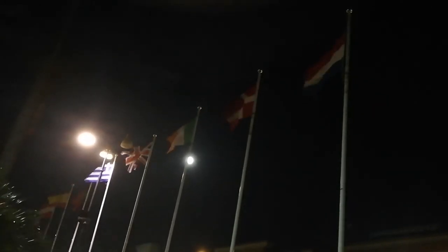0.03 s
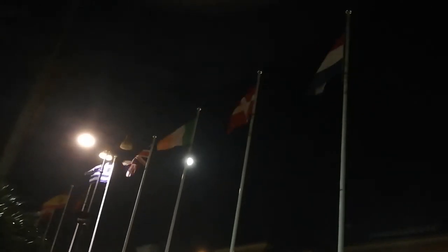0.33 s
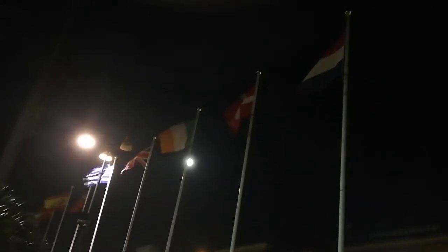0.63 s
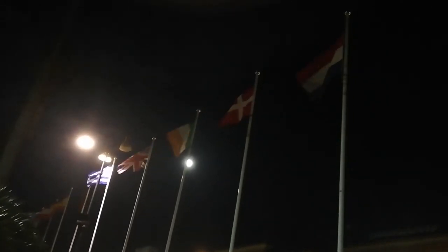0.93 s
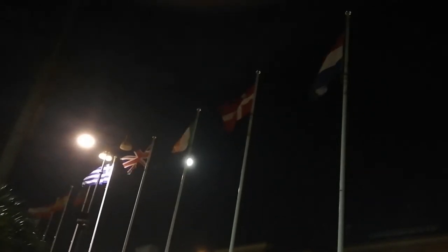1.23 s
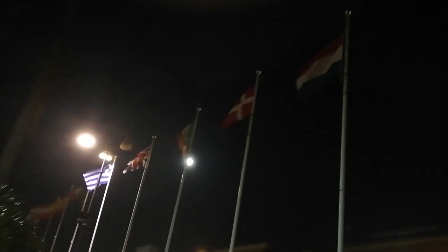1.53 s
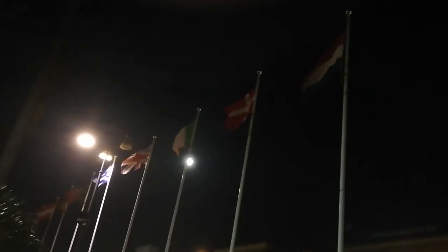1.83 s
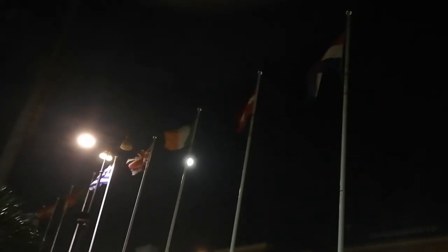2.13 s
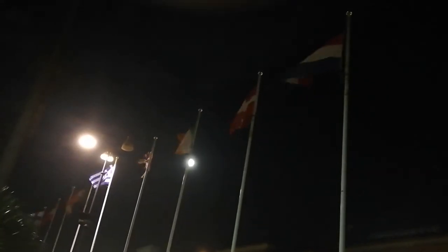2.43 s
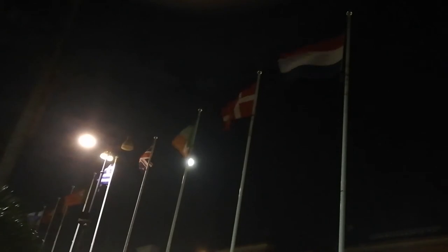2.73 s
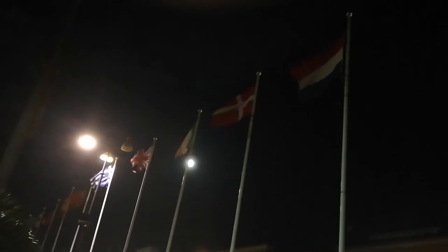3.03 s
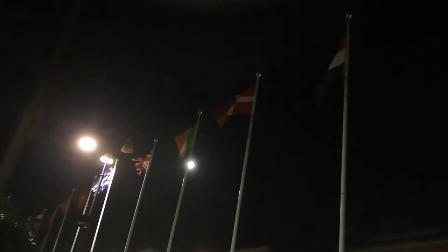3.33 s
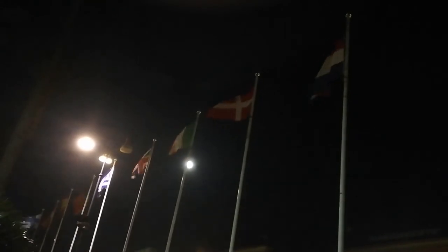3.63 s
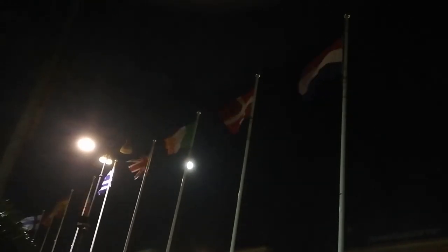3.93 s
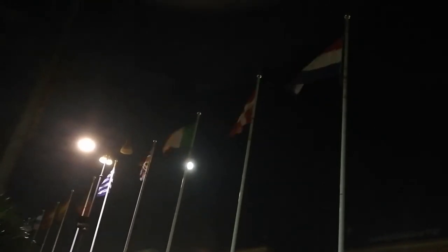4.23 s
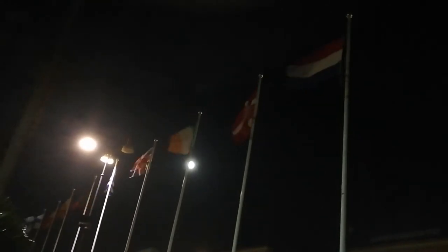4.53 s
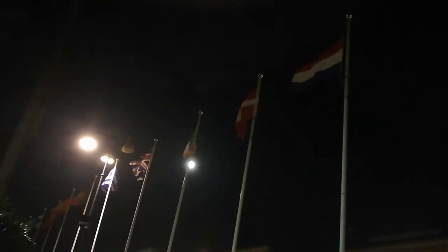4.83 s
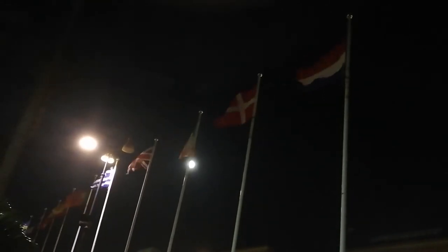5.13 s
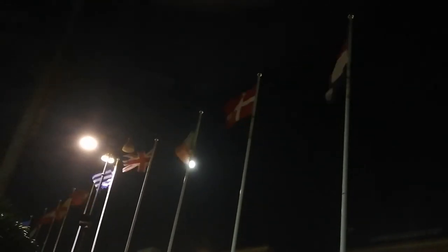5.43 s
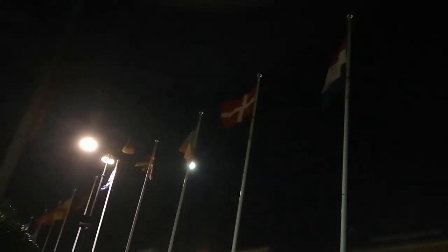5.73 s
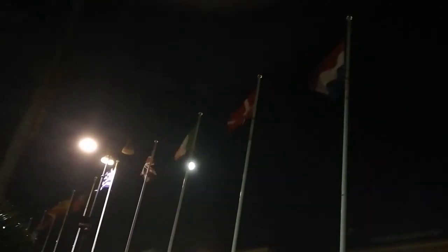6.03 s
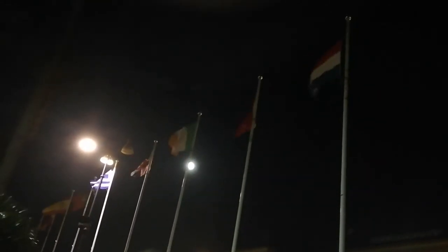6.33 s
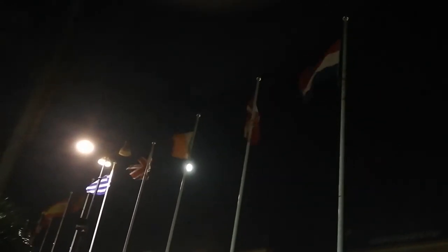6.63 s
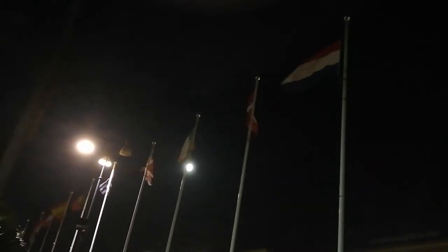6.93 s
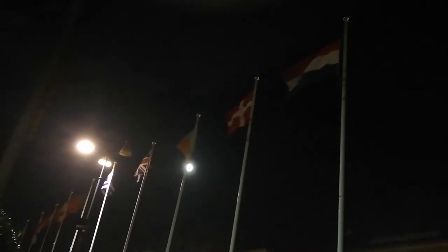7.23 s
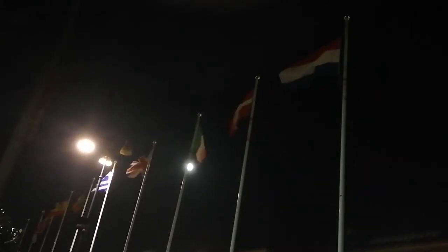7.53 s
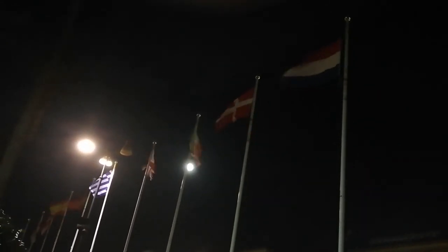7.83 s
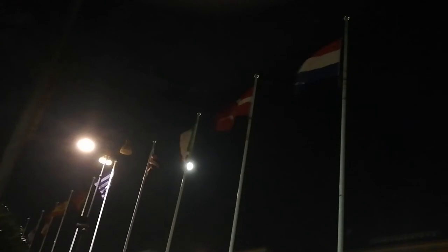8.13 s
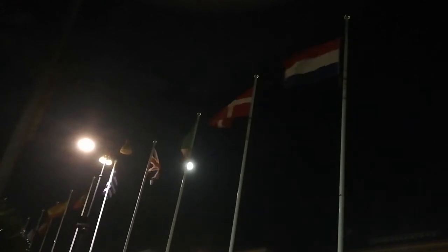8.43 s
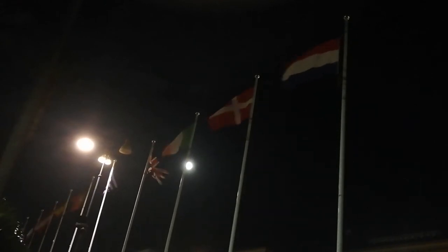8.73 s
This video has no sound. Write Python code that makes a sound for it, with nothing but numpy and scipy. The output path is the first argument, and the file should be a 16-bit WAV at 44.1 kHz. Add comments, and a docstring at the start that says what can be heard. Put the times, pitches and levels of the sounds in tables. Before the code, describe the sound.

Gusty wind rumbles and buffets the microphone while ropes knock and click against hollow flagpoles and flags snap lightly.

```python
"""Flagpoles on a windy night.

Gusts rumble, buffet and tear at two microphone ports; hard ones duck the gain.
Ropes slap hollow poles, which knock and ring. Folds whip through the flags and crackle.
Behind: a hiss of distant wind and town, rustling leaves, a faint whistle across a pole."""
import sys
import numpy as np
from scipy import signal
from scipy.fft import rfft, irfft, next_fast_len
from scipy.io import wavfile
from scipy.ndimage import uniform_filter1d

SR = 44100
rng = np.random.default_rng(int(sys.argv[2]) if len(sys.argv) > 2 else 0)


def bounce(signal):
    """Save signal as a 16-bit WAV file at the path given by the first command-line argument."""
    frames = np.transpose(np.atleast_2d(signal))
    limited = np.clip(frames, -1, 1)
    pcm = np.round(limited * 32767).astype(np.int16)
    wavfile.write(sys.argv[1], SR, pcm)


N = 387638

# breeze between gusts: t/s, level re calm/dB
BREEZE_LEVEL = [(0, -1), (0.75, -1), (1.6, 0.4), (2.6, 0.7), (4.1, -1.5), (4.85, 3.5), (6.5, 7), (7.08, 1),
                (7.7, 4.5), (8.55, 0.5)]
# gusts over the ports: t/s, length/s, rumble/dB, buffet/dB, tear/dB
GUST_EVENTS = [(3.013, 0.057, -49, -33, -51), (3.21, 0.05, -37, -34.5, -42.5),
               (3.428, 0.18, -33.5, -31, -43.5), (3.596, 0.049, -20.5, -26.5, -35.5),
               (3.652, 0.176, -48, -28.5, -43), (3.861, 0.063, -22, -26.5, -33),
               (3.944, .11, -36, -33.5, -55), (4.161, 0.027, -52, -26, -52), (4.272, 0.034, -28, -32, -52),
               (4.454, 0.16, -27.5, -29.5, -47), (4.684, 0.054, -31, -29, -59),
               (4.972, 0.032, -23.5, -24, -32), (5.073, 0.19, -23.5, -27.5, -34),
               (5.309, 0.078, -24, -22.5, -31), (5.385, 0.21, -29, -18.5, -28.5),
               (5.602, 0.099, -30, -25.5, -31), (5.764, 0.085, -24.5, -20.5, -34),
               (5.909, 0.11, -42, -23.5, -35), (6.102, 0.083, -37, -27, -39),
               (6.192, 0.174, -28.5, -23.5, -34), (6.382, 0.097, -29, -19.5, -29),
               (6.545, 0.11, -29.5, -23.5, -33.5), (6.699, 0.037, -27, -22, -43),
               (6.814, 0.11, -37, -20, -29), (7.26, .09, -35, -27.5, -35), (7.387, 0.063, -41, -23, -34.5),
               (7.709, 0.22, -49, -25.5, -40), (7.951, 0.082, -31, -24.5, -41),
               (8.178, 0.036, -28, -28, -45), (8.316, 0.069, -28.5, -34, -44),
               (8.661, 0.12, -45, -30.5, -45)]
# head-on eddies: t/s, length/s, level/dB, low-pass f/Hz
BLAST_EVENTS = [(4.999, 0.0098, -10, 900), (5.234, 0.028, -16.5, 465), (5.618, 0.018, -21.5, 665),
                (6.378, 0.026, -16.5, 740), (6.398, 0.059, -12.5, 850), (6.917, 0.0126, -15.5, 470),
                (7.425, 0.013, -25.5, 560)]
# rope on pole: t/s, knock/dB, click/dB, hollow ring/dB, ping f/Hz
SLAP_EVENTS = [(0.32, -44, -45, -52, 3300), (1.623, -44.5, -44, -44, 3260), (1.761, -48, -49, -43, 3300),
               (2.428, -40, -48, -36, 3300), (2.670, -44, -54, -58, 3300), (3.233, -36, -37, -35, 3370),
               (3.671, -31, -28.5, -41, 3080), (3.972, -42.5, -47, -39, 2980),
               (4.149, -46, -48.5, -56, 3300), (4.600, -48, -53, -37, 3300), (4.743, -36, -40, -57, 3500),
               (4.797, -47, -47, -36.5, 3300), (5.679, -42, -47, -57, 3300), (5.801, -43, -46, -58, 2200),
               (5.931, -35, -40.5, -33, 3180), (6.03, -42, -50, -32, 3300), (6.068, -53, -61, -35.5, 3300),
               (6.093, -40.5, -41.5, -48, 3300), (6.573, -40, -35.5, -50, 3120),
               (7.045, -42, -46.5, -58, 2100), (7.383, -45, -49, -56, 3300),
               (7.747, -40.5, -42.5, -63, 3340), (7.887, -38.5, -37.5, -30, 2550),
               (8.123, -29, -32, -29.5, 5300), (8.515, -42.5, -50, -58, 3300),
               (8.596, -31.5, -34, -31.5, 3560), (8.620, -46, -44, -44, 3530),
               (8.643, -46, -42.5, -42, 3500)]
# upper pole modes: f/Hz, relative level/dB, t60/s
POLE_MODES = [(1153, 14, 0.036), (1380, -9, 0.016), (1629, 12.5, 0.063), (1930, -2, 0.011),
              (2258, -2, 0.14), (2890, 10.5, 0.043), (3496, 2.5, 0.03), (3790, 1, 0.046),
              (4490, 15.5, 0.019), (5390, 11, 0.011), (8000, 10.5, 0.008), (11930, 3, 0.01)]
# contact crack: f/Hz, relative density/dB
CRACK_SPECTRUM = [(450, -30), (700, -9), (950, 3.5), (1800, 5.5), (3000, -6), (5200, -39), (6500, -17),
                  (9000, -16.5), (12300, -25), (15500, -51)]
# flag flicks: t/s, relative peak/dB, decay/s, swish f/Hz
FLICK_EVENTS = [(1.9277, -38, .02, 9700), (3.575, -31, .01, 4460), (4.0733, -24, .008, 9700),
                (6.1754, -27, 0.025, 9600), (6.202, -29.5, .022, 9600), (7.0673, -33, .02, 9700),
                (7.197, -31.5, .025, 4300), (7.221, -23.5, .016, 9600), (8.363, -28.5, .012, 9000),
                (8.6418, -36, .024, 7000), (8.6915, -26, .02, 8250)]
# cloth crackle: f/Hz, relative density/dB
CLOTH_SPECTRUM = [(1500, -28), (3000, 3), (4200, 2), (6500, -1), (9800, 3.5), (12000, -9), (15500, -20)]
# wash of distant wind and town: t/s, relative level/dB
WASH_LEVEL = [(0.0, -48), (1.3, -48.4), (3.57, -48.5), (5.6, -49.5), (6.4, -49), (7.07, -49.5),
              (8.47, -49.5), (8.79, -47.5)]
# colour of the wash: f/Hz, relative density/dB
WASH_SPECTRUM = [(450, -9.5), (650, -4), (880, -0.5), (1250, -2), (1900, -1), (2500, -8.5), (3300, -7.5),
                 (4400, -10.5), (5800, -14.5), (8000, -13.5), (9700, -13), (11300, -22), (12700, -23.5),
                 (15500, -46)]
# bush stirring: t/s, level/dB
LEAF_LEVEL = [(0, -71), (1.3, -72), (1.65, -57), (2.45, -58), (2.9, -60), (4.2, -64), (4.9, -65.5),
              (8.79, -64)]
# wind across a hollow pole: t/s, level/dB
WHISTLE_LEVEL = [(0, -71), (.6, -54), (1.0, -59), (1.7, -58), (3.0, -75), (8.79, -76)]
# ground and wall echoes: delay/s, gain before low-pass/dB
ECHO_TAPS = [(0.021, -13.5), (0.049, -18.5), (.057, -21.5)]
# port colour: f/Hz, left minus right/dB
PORT_BALANCE = [(200, -0.5), (450, -1.5), (650, -6), (900, -4), (1250, -0.5), (1900, -3), (4000, -2.5),
                (5800, -2), (8000, -1), (9700, 3.5), (10600, 3.5), (11300, -16), (12700, 1.5), (15500, -17)]


def wind(calm_db=(-38, -46, -48.5), waver_db=2.0, flutter_db=1.5):
    """Large eddies rumble, medium ones buffet, small ones tear; gusts add power to the breeze."""
    (breeze_db,) = envelopes(BREEZE_LEVEL)
    power = from_db(np.add.outer(calm_db, breeze_db)) ** 2
    for start_s, length_s, *levels_db in GUST_EVENTS:
        power += np.outer(from_db(levels_db), gust(start_s, length_s)) ** 2
    rumble, buffet, tear = np.sqrt(power)
    large = eddies([33.2, 94.0], knee_hz=152, own_db=-20, lump_db=5.5, rate_hz=8.3, span_s=0.055, order=2)
    medium = eddies([87.8, 244], knee_hz=157, own_db=-10, lump_db=5.0, rate_hz=45, span_s=0.048)
    small = eddies([199, 532], knee_hz=310, own_db=-14.5, lump_db=3.5, rate_hz=60, span_s=0.13)
    waver = from_db(waver_db * drift(rate_hz=11))
    flutter = from_db(flutter_db * drift(rate_hz=36))
    return rumble * large * waver + (buffet * medium + tear * small) * flutter


def gust(start_s, length_s, attack_s=0.024, release_s=0.026):
    """Gust envelope: quick swell, hold, exponential decay."""
    t = np.arange(N) / SR - start_s
    rise = np.clip(0.5 + t / (2 * attack_s), 0, 1)
    return rise * np.exp(-np.clip((t - length_s) / release_s, 0, 20))


def eddies(band_hz, knee_hz, own_db, lump_db, rate_hz, span_s, order=3):
    """Pressure of one eddy size: lumpy band noise, falling above a knee."""
    band = cut(turbulence(N + SR, own_db), band_hz, "band", order=order)
    pressure = cut(band, knee_hz, "low")[:, SR:]  # skip filter settling
    lumps = from_db(lump_db * drift(rate_hz))
    return flatten_swells(pressure * lumps, span_s)


def blasts():
    """Eddies hitting the ports head-on: short, hard splutters."""
    out, t = np.zeros((2, N)), np.arange(SR // 8) / SR
    for start_s, length_s, level_db, top_hz in BLAST_EVENTS:
        swell = np.sqrt(np.abs(np.sin(np.pi * np.minimum(t / length_s, 1))))
        burst = cut(turbulence(len(t), own_db=-17) * swell, top_hz, "low", order=4)
        burst = cut(cut(burst, 234, "low", order=1), 75, "high")
        add(out, start_s, from_db(level_db) * unit_burst(burst, length_s))
    return out


def delay_left(pressure, lag_s=0.00078):
    """Wind noise in the left channel lags the right by about 0.8 ms."""
    n = np.arange(pressure.shape[-1])
    return np.array([np.interp(n - lag_s * SR, n, pressure[0]), pressure[1]])


def ropes(far_per_s=4.9):
    """Loud slaps on near poles; faint random ones down the row."""
    out = np.zeros((2, N))
    for start_s, knock_db, click_db, hollow_db, ping_hz in SLAP_EVENTS:
        add(out, start_s, slap(knock_db, click_db))
        add(out, start_s, hollow_ring(hollow_db))
        add(out, start_s, ping(click_db, ping_hz))
    for when, distance in rng.random((int(far_per_s * N / SR), 2)):
        add(out, when * N / SR, from_db(-8 * distance) * slap(knock_db=-46, click_db=-49))
    return out


def rope_contact(t, decay_s=0.00094, rebound_s=0.003, buzz_db=-22, buzz_s=0.013, give_s=0.00017):
    """The rope gives as it lands, rebounds once and buzzes as it settles."""
    since_s = t - rebound_s * rng.uniform(0.63, 1.2)
    buzz = from_db(buzz_db) * np.exp(-abs(since_s) / buzz_s)
    rebound = (since_s > 0) * (np.exp(-abs(since_s) / (2 * decay_s)) + buzz)
    touches = np.exp(-t / decay_s) + rng.uniform(0.76, 0.8) * rebound
    onset = (1 - np.exp(-t / give_s)) ** 2
    return touches * turbulence(len(t), own_db=-2) * onset


def slap(knock_db, click_db, crack_db=7):
    """Contact cracks and rings the tube; the hit sounds as a knock in the mids and a click in the treble."""
    t = np.arange(SR // 6) / SR
    contact = rope_contact(t)
    detune = 1 + 0.024 * rng.standard_normal()  # no two poles alike
    modes = np.zeros(len(t))
    for k, (hz, level_db, t60_s) in enumerate(POLE_MODES):
        decay = from_db(level_db + rng.normal(0, 2.4) - 60 * t / t60_s)
        modes += (-1) ** k * decay * np.sin(2 * np.pi * hz * detune * t)
    ring = unit_rms(signal.fftconvolve(contact, modes[None])[:, :len(t)])
    hit = ring + from_db(crack_db) * unit_rms(colour(contact, CRACK_SPECTRUM))
    mids = cut(cut(hit, 2000, "low", order=3), 1130, "high", order=3)
    knock = unit_burst(mids, length_s=0.023)
    click = unit_burst(cut(hit, 2050, "high", order=3), length_s=0.012)
    return from_db(knock_db) * knock + from_db(click_db) * click


def hollow_ring(level_db, hz=945, t60_s=0.089, attack_s=0.00028):
    """The tube's lowest tone outlasts the slap."""
    t = np.arange(SR // 4) / SR
    detune = 1 + 0.013 * rng.standard_normal()
    phase = 2 * np.pi * (hz * detune * t + rng.random((2, 1)))
    return from_db(level_db - 60 * t / t60_s) * (1 - np.exp(-t / attack_s)) * np.sin(phase)


def ping(click_db, hz, offset_db=-8, width_hz=750, decay_s=0.0089):
    """Hardware on the rope rings briefly at its own pitch."""
    t = np.arange(SR // 20) / SR
    strike = turbulence(len(t), own_db=0.5) * np.exp(-t / decay_s)
    ring = band_around(strike, hz, width_hz)
    return from_db(click_db + offset_db) * unit_burst(ring, length_s=0.017)


def cloth(grain_spread_db=5.5, grains_per_s=3500, attack_s=0.00023, swish_db=-3, trim_db=-4):
    """A fold whips through a flag: fine crackle, one narrow band stressed."""
    out, t = np.zeros((2, N)), np.arange(SR // 6) / SR
    for start_s, peak_db, decay_s, swish_hz in FLICK_EVENTS:
        hits = rng.random((2, len(t))) < grains_per_s / SR
        sizes = from_db(grain_spread_db * np.minimum(rng.exponential(1, hits.shape), 3))
        grains = hits * sizes * rng.choice([-1, 1], hits.shape)
        swell = (1 - np.exp(-t / attack_s)) * np.exp(-t / decay_s)
        crackle = colour(grains * swell, CLOTH_SPECTRUM)
        flick = crackle + from_db(swish_db) * band_around(crackle, swish_hz, width_hz=750, order=1)
        add(out, start_s, from_db(peak_db + trim_db) * flick / np.max(abs(flick.mean(0))))
    return out


def outdoors(x, tail_db=-4.5, t60_s=0.27, gap_s=0.006, dull_hz=1900):
    """Add dull echoes and thin scatter from poles and buildings."""
    t = np.arange(SR // 2) / SR
    response = rng.standard_normal((2, len(t))) * from_db(-60 * t / t60_s) * (t > gap_s)
    response = from_db(tail_db) * response / np.sqrt(np.sum(response[0] ** 2))
    for delay_s, gain_db in ECHO_TAPS:
        add(response, delay_s, np.full((2, 1), from_db(gain_db)))
    reflections = signal.fftconvolve(x, response, axes=1)[:, :N]
    return x + cut(reflections, dull_hz, "low", order=1)


def air(trim_db=4.5, flutter_db=0.4):
    """Diffuse wash, uncorrelated at the ports, fluttering with the far flags."""
    (level_db,) = envelopes(WASH_LEVEL)
    wash = unit_rms(cut(colour(rng.standard_normal((2, N)), WASH_SPECTRUM), 420, "high"))
    return wash * from_db(level_db + trim_db + flutter_db * drift(rate_hz=25))


def leaves(flutter_db=1.5, band_hz=(3000, 9500)):
    """A bush stirs: fine, bright rustle that comes and goes."""
    (level_db,) = envelopes(LEAF_LEVEL)
    gain = from_db(level_db + flutter_db * drift(rate_hz=25))
    return gain * unit_rms(cut(rng.standard_normal((2, N)), band_hz, "band", order=1))


def whistle(hz=945, width_hz=50, waver_hz=22):
    """Wind sounds a pole's lowest tone, faint and unsteady in pitch."""
    (level_db,) = envelopes(WHISTLE_LEVEL)
    tone = band_around(rng.standard_normal((2, N)), hz, width_hz)
    position = np.cumsum(1 + waver_hz / hz * drift(rate_hz=2.8))
    wavering = np.array([np.interp(position, np.arange(N), side, right=0) for side in tone])
    return from_db(level_db) * unit_rms(wavering)


def gain_control(x, threshold_db=-22.5, slope=0.41, release_db_per_s=28.5, attack_s=0.0035):
    """Compressor: a hard gust briefly ducks everything."""
    power = uniform_filter1d(np.mean(x * x, 0), SR // 100)
    level_db = 10 * np.log10(np.abs(power) + 1e-12)
    reduction_db = slope * np.maximum(level_db - threshold_db, 0)
    ramp_db = release_db_per_s * np.arange(N) / SR
    held_db = np.maximum.accumulate(reduction_db + ramp_db) - ramp_db
    return x * from_db(-cut(held_db, 1 / (2 * np.pi * attack_s), "low", order=1))


def turbulence(size, own_db):
    """White noise common to both ports, plus each port's own at own_db."""
    return rng.standard_normal(size) + from_db(own_db) * rng.standard_normal((2, size))


def drift(rate_hz):
    """Random curve, rms 1, linear between knots at rate_hz."""
    knots = rng.standard_normal(4000)
    return unit_rms(np.interp(np.arange(N) / SR * rate_hz, np.arange(len(knots)), knots))


def flatten_swells(x, span_s):
    """Even out swells slower than span_s; rms 1."""
    window = int(span_s * SR)
    power = uniform_filter1d(uniform_filter1d(np.mean(x * x, 0), window), window)
    return unit_rms(x / np.sqrt(power + 1e-12))


def envelopes(rows):
    """Each level column of a time table, per sample."""
    times_s, *columns = np.transpose(rows)
    return [np.interp(np.arange(N) / SR, times_s, column) for column in columns]


def colour(x, spectrum):
    """Filter by (f/Hz, gain/dB) points, interpolated in log f."""
    size = next_fast_len(x.shape[-1] + SR // 20)
    bins_hz = np.arange(size // 2 + 1) * SR / size
    points_hz, points_db = np.transpose(spectrum)
    gain_db = np.interp(np.log(np.maximum(bins_hz, 1)), np.log(points_hz), points_db)
    return irfft(rfft(x, size) * from_db(gain_db), size)[..., :x.shape[-1]]


def cut(x, hz, kind, order=2):
    return signal.sosfilt(signal.butter(order, hz, kind, fs=SR, output="sos"), x)


def band_around(x, hz, width_hz, order=2):
    return cut(x, [hz - width_hz / 2, hz + width_hz / 2], "band", order)


def from_db(db):
    return 10 ** (np.asarray(db) / 20)


def unit_rms(x):
    return x / np.sqrt(np.mean(x ** 2) + 1e-20)


def unit_burst(burst, length_s):
    """Scale a stereo burst to the energy of rms 1 held for length_s."""
    return burst / np.sqrt(np.sum(burst ** 2) / (2 * length_s * SR) + 1e-20)


def add(track, start_s, sound):
    """Mix in a stereo sound at start_s."""
    start = max(round(start_s * SR), 0)
    track[:, start:start + sound.shape[-1]] += sound[:, :max(N - start, 0)]


def scene():
    """Wind at the ports, echoing ropes and flags, background."""
    return delay_left(wind() + blasts()) + outdoors(ropes() + cloth()) + air() + leaves() + whistle()


def record(dry):
    """Port colour, 16 Hz high-pass, gain control, steep 15.6 kHz low-pass."""
    left = colour(dry[0], [(hz, db / 2) for hz, db in PORT_BALANCE])
    right = colour(dry[1], [(hz, -db / 2) for hz, db in PORT_BALANCE])
    ports = gain_control(cut(np.array([left, right]), 16, "high"))
    return signal.sosfilt(signal.ellip(10, 0.1, 80, 15600, fs=SR, output="sos"), ports)


dry = scene()
out = record(dry)
bounce(out)
```